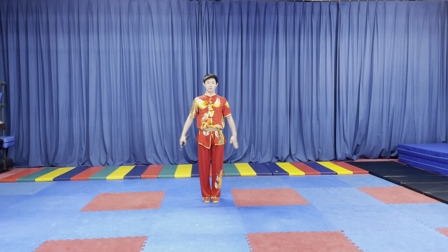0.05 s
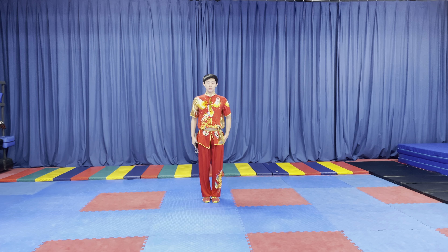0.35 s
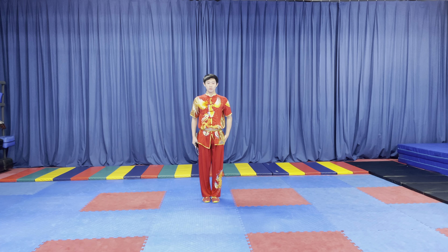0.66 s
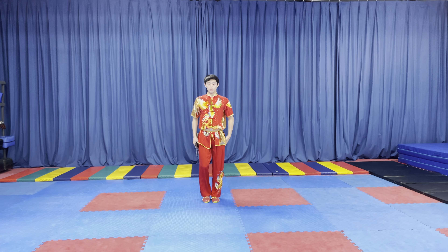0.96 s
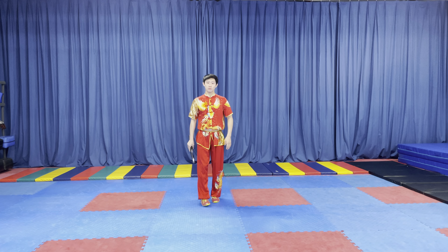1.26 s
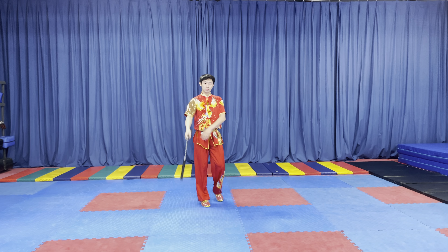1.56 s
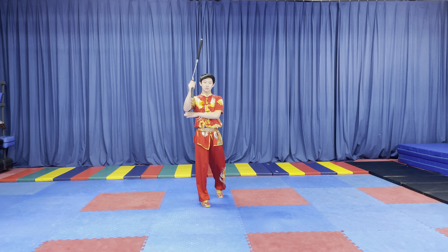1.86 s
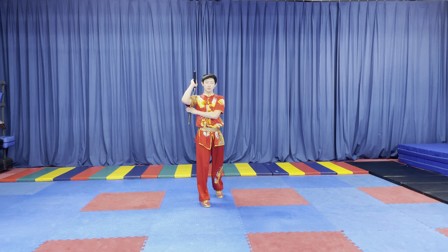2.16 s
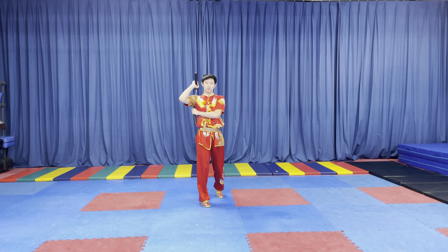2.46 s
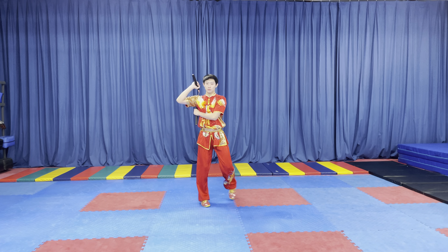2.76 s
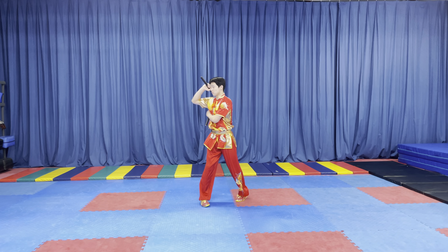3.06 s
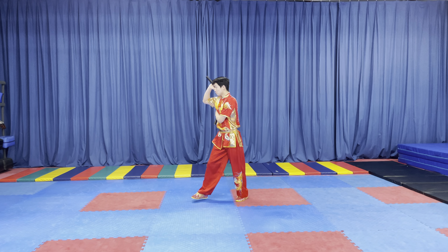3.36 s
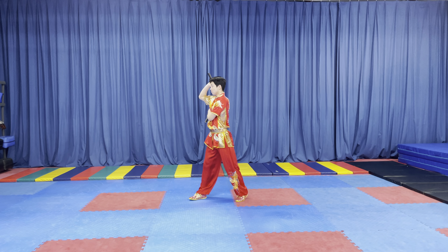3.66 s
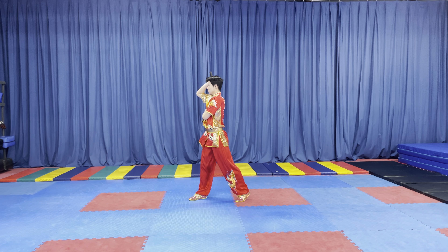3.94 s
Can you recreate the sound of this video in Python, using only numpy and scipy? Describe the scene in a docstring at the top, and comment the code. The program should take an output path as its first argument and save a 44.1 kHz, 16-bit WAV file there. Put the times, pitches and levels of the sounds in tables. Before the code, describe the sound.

A nunchaku's chain clicks and jingles as its sticks clack, with soft steps on a mat.

```python
"""A nunchaku is handled some metres away in a large curtained hall. Its steel chain links click, chatter
and ring very high until a neighbour damps them, and the sticks clack and slide as they are let go and
swung. A satin suit rustles with the arms; soft steps, scuffs and a light slap come from the mat.
Under it all lie the hall's low rumble, a faint hiss and a mains hum."""
import sys
import numpy as np
from scipy import signal
from scipy.fft import rfft, irfft
from scipy.io import wavfile

SR = 44100
rng = np.random.default_rng(int(sys.argv[2]) if len(sys.argv) > 2 else 0)


def materialize(psi):
    """Save the field psi as 16-bit PCM at rate SR to the path in sys.argv[1].

    A 1-D psi becomes a single channel; in a 2-D psi each row is a channel.
    """
    bounded = np.clip(np.atleast_2d(psi).T, -1, 1)
    quanta = np.round(bounded * 32767).astype(np.int16)
    wavfile.write(sys.argv[1], SR, quanta)


N = 176400

# steel link modes (frequency [Hz], level [dB], t60 [s])
LINK_MODES = [(13299, 0, .7), (13348, -8, .15), (14960, -24, .5), (15463, -17, .5), (15600, -12, .5),
              (15694, -6, .4)]
# a link hangs free (time [s], level [dB], tilt [dB/kHz], attack [s], time until damped [s])
LINK_RINGS = [(0.438, -46.5, 0, 0.0015, .011), (0.447, -60, 3.5, .002, 0.048),
              (0.517, -68, 8, 0.0036, 0.025), (.533, -63, 5.5, 0.0014, 0.019),
              (0.58, -56.5, -6, 0.014, 0.091), (1.286, -65, -3, 0.0012, 0.014),
              (1.304, -80, 3, 0.0038, 0.026)]
def link_rings():
    """Links ring after a contact until a neighbour touches and damps them."""
    pivot_hz = 13300
    out = np.zeros(N)
    for start, level, tilt, rise, free in LINK_RINGS:
        modes = [(hz, level + db + tilt * (hz - pivot_hz) / 1000, t60) for hz, db, t60 in LINK_MODES]
        attack = np.minimum(since(start) / rise, 1)
        damping = 1 / (1 + (since(start) / free) ** 4)
        out += ring(start, modes) * attack * damping
    return out


# the chain runs slack (time [s], attack [s], hold [s], release [s], level [dB])
JINGLES = [(0, 0.0011, 0.015, 0.12, -80), (0.305, 0.0033, 0.008, 0.06, -66),
           (0.434, 0.0036, 0.017, 0.059, -63), (0.516, 0.0089, 0.013, 0.081, -69),
           (1.02, 0.028, 0.034, 0.03, -81), (1.295, 0.075, 0.021, 0.029, -64),
           (1.46, .02, 0.06, 0.099, -77.5), (1.847, 0.017, 0.033, 0.033, -84),
           (2.188, .02, 0.067, 0.055, -77.5)]
# glassy top of the chatter (frequency [Hz], level [dB])
JINGLE_EQ = [(7000, -29.5), (10500, -23.5), (12400, 2), (13400, 9), (14600, 6), (15600, -2), (16000, -6)]
def chain_jingle():
    """Many small link contacts run together into a high chatter."""
    chatter = colour(grains(per_second=800, spread=0.66), JINGLE_EQ)
    return chatter * swells(JINGLES)


# link hits link (time [s], level [dB])
CLICKS = [(.003, -57), (0.131, -47), (.138, -46), (.3185, -44), (.438, -40), (.462, -42), (.524, -51),
          (0.533, -47), (0.638, -58), (0.755, -57), (.879, -65), (1.024, -62), (1.039, -65), (1.351, -30),
          (1.357, -33.5), (1.535, -52), (1.644, -52)]
# bright tick of steel (frequency [Hz], level [dB])
CLICK_EQ = [(2000, -12.5), (5000, -22), (8000, -24), (11000, -6.5), (13200, 6), (14600, -19), (15700, 5.5)]
# chain hits stick (time [s], level [dB])
RATTLES = [(2.289, -60.5), (2.297, -73), (2.312, -62)]
# duller bite of the rattle (frequency [Hz], level [dB])
RATTLE_EQ = [(3000, -13.5), (4800, 2), (6400, -1.5), (9000, -20)]
def chain_hits():
    """Links click together and rattle over the end of a stick."""
    return impacts(CLICKS, CLICK_EQ, decay_s=0.001) + impacts(RATTLES, RATTLE_EQ, decay_s=0.0012)


# swivel pings (time [s], frequency [Hz], level [dB], t60 [s])
SWIVEL_PINGS = [(.445, 7940, -76, 0.41), (.452, 8087, -69.5, 0.32), (.644, 6390, -83, 0.087)]
def swivel():
    """The swivel rings with one mode each time the chain jerks it."""
    return sum(ring(start, [mode]) for start, *mode in SWIVEL_PINGS)


# stick hits, and at 1.357 s the bright snap of the chain pulling taut (time [s], ring level [dB], crack level
# [dB], crack tilt [dB/octave])
CLACKS = [(.319, -75, -62, 6), (1.357, -69, -44.5, 5), (1.3592, -45.5, -49.5, -2), (1.3643, -49, -46, -1.5),
          (1.371, -66, -53, 0), (1.3846, -53, -50, -0.5), (1.641, -69, -81, 8), (1.727, -65.5, -76, -3),
          (2.232, -72, -58.5, 7.5), (2.5522, -59, -51, 2), (2.8888, -72, -63, -2)]
# tone of the crack before its tilt (frequency [Hz], level [dB])
CRACK_EQ = [(150, 8), (420, 9), (850, 5), (2600, 2), (3800, -8), (4900, -5.5), (7000, -14.5),
            (10000, -25.5), (15000, -21)]
def stick_cracks():
    """The transient of each clack, and of the chain's taut snap: a burst of contact noise with its own
    brightness."""
    return sum(impacts([(start, db)], tilted(CRACK_EQ, tilt), decay_s=0.0012)
               for start, _, db, tilt in CLACKS)


# stick modes (frequency [Hz], level [dB], t60 [s])
STICK_MODES = [(1285, -9, 0.011), (2217, 1, 0.012), (4900, -22, 0.0074)]
def stick_knocks():
    """The body of each clack: the struck stick gives a short, pitched knock."""
    return sum(amp(db) * ring(start, STICK_MODES) for start, db, _, _ in CLACKS)


# stick slides (time [s], attack [s], hold [s], release [s], level [dB])
SLIDES = [(.298, 0.019, 0.0047, 0.074, -67.5), (.43, 0.012, 0.01, 0.075, -70),
          (1.38, 0.079, 0.056, 0.052, -75)]
# midrange rasp (frequency [Hz], level [dB])
SLIDE_EQ = [(500, -19.5), (1200, -9), (1700, 4), (2300, -2), (2900, -21), (6000, -27)]
def stick_slides():
    """The sticks rub on each other and in the hand."""
    return noise(SLIDE_EQ) * swells(SLIDES)


# arm moves (time [s], attack [s], hold [s], release [s], level [dB], tilt [dB/octave])
RUSTLES = [(0.127, 0.015, 0.011, 0.079, -68, 3.5), (0.443, 0.021, 0.1, 0.15, -80.5, 6),
           (1.014, 0.06, 0.012, 0.016, -80, 0), (1.362, 0.0069, 0.024, 0.049, -66.5, 1.5),
           (1.443, 0.028, 0.038, 0.11, -73.5, -1.5), (1.628, 0.011, 0.015, 0.021, -72, 0),
           (1.836, 0.01, 0.049, 0.079, -74.5, -5), (2.028, 0.078, 0.037, 0.07, -77.5, -0.5),
           (2.194, 0.031, 0.09, 0.022, -75.5, 5), (3.188, 0.023, 0.018, 0.012, -69.5, 2),
           (3.222, 0.033, 0.016, 0.012, -64.5, 6.5), (3.6, 0.018, 0.014, 0.018, -85, 2),
           (3.778, 0.017, 0.0093, 0.018, -83, 0.5)]
# sheen of satin (frequency [Hz], level [dB])
SATIN_EQ = [(500, -11), (1500, 8.5), (3000, 0), (5000, -3), (7000, -1.5), (8300, -7.5), (9600, -7.5),
            (13300, -5), (15500, -15)]
def suit_rustle():
    """Satin folds rub in tiny uneven grains, brighter or duller with each move."""
    rub = grains(per_second=700, spread=0.43)
    return sum(swell(*shape) * colour(rub, tilted(SATIN_EQ, tilt)) for *shape, tilt in RUSTLES)


# footfalls (time [s], attack [s], hold [s], release [s], level [dB])
STEPS = [(1.1, 0.026, 0.028, 0.031, -44), (2.11, 0.006, 0.021, 0.054, -43.5),
         (2.61, 0.022, 0.015, 0.042, -44), (3.0, 0.0075, 0.069, 0.08, -44.5)]
# deep, padded thud (frequency [Hz], level [dB])
STEP_EQ = [(25, -25), (58, 19), (95, 7), (150, -11.5), (400, -27.5), (1200, -75)]
def footsteps():
    """Feet land softly on the mat in swells of bass noise."""
    return noise(STEP_EQ) * swells(STEPS)


# sole drags (time [s], attack [s], hold [s], release [s], level [dB])
SCUFFS = [(.56, 0.072, .29, 0.028, -74.5), (2.94, 0.05, 0.083, 0.086, -66),
          (3.11, 0.0077, 0.025, 0.048, -64), (3.32, 0.047, .03, 0.078, -66.5)]
# muffled low-mid brush (frequency [Hz], level [dB])
SCUFF_EQ = [(120, -7), (280, 8.5), (600, 7.5), (950, -10), (1500, -21), (3000, -47)]
def sole_scuffs():
    """Soles rub across the mat."""
    return noise(SCUFF_EQ) * swells(SCUFFS)


# sole hits (time [s], level [dB])
SLAPS = [(3.9112, -45.5), (3.922, -58)]
# dull smack (frequency [Hz], level [dB])
SLAP_EQ = [(150, 4.5), (600, -3.5), (1050, 2), (1600, -12.5), (2200, -13.5), (3200, -41), (4600, -16.5),
           (6000, -37), (12000, -57)]
def foot_slap():
    """A foot lands with a light slap."""
    return impacts(SLAPS, SLAP_EQ, decay_s=0.0019)


def floor_bounce(x, delay_s, echo_db):
    """A sound plus its single reflection off the floor."""
    return x + amp(echo_db) * np.pad(x, (int(delay_s * SR), 0))[:N]


# reverb decay (frequency [Hz], t60 [s])
HALL_DECAY = [(200, 0.81), (2000, 0.5), (6000, 0.35), (14000, 0.14)]
def hall_tail():
    """Diffuse stereo tail of unit energy; the treble dies first."""
    t = np.arange(SR) / SR
    hz, t60s = np.array(HALL_DECAY).T
    spectrum = rfft(rng.standard_normal((2, SR)))
    log_f = np.log(np.arange(SR // 2 + 1) + 1)
    tail = np.zeros((2, SR))
    for share, t60 in zip(np.eye(len(hz)), t60s):
        band = irfft(spectrum * np.interp(log_f, np.log(hz), share))
        tail += band * np.exp(-np.log(1000) * t / t60)
    build_up = 1 - np.exp(-t / 0.0014)
    return unit(tail * build_up) / np.sqrt(SR)


def in_hall(x, tail, wet_db, lag_s=0):
    """Direct sound reaches the right microphone port lag_s after the left; the hall adds its tail."""
    hz = np.arange(N // 2 + 1) * SR / N
    right = irfft(rfft(x) * np.exp(-2j * np.pi * hz * lag_s))
    reverb = signal.fftconvolve(x[None], tail, axes=1)[:, :N]
    return np.array([x, right]) + amp(wet_db) * reverb


# low, middle and high layers of the room tone (frequency [Hz], level [dB])
RUMBLE_EQ = [(20, -39.5), (32, -13), (42, -7), (62, 3.5), (73, -5.5), (90, 0), (125, -8), (180, -11.5),
             (260, -21), (400, -31.5), (900, -80.5)]
MURK_EQ = [(40, -14), (130, 4.5), (250, 7), (450, 1.5), (800, -0.5), (1300, -8), (2000, -13), (2900, -33.5),
           (6000, -51)]
HISS_EQ = [(1000, -1), (4500, 0), (7000, -2), (9500, -10), (13000, -8), (15000, -21.5)]
# room tone fader moves (time [s], rumble trim [dB], murk level [dB])
ROOM_FADERS = [(0, -2.5, -65), (.5, -0.5, -66), (.85, -1, -65.5), (1.1, -2, -66.5), (1.7, 1, -65.5),
               (2.3, -1.5, -63.5), (2.8, 0.5, -62.5), (4, 1.3, -59)]
def room_tone():
    """The hall's air: a narrow rumble, a wide murky middle and a faint hiss."""
    times, trim_db, murk_db = np.array(ROOM_FADERS).T
    rumble = amp(-49) * fader(times, trim_db) * stereo_noise(RUMBLE_EQ, side=0.17) * pan(left_db=-0.4)
    murk = fader(times, murk_db) * stereo_noise(MURK_EQ, side=1.134) * pan(left_db=1)
    hiss = amp(-84.5) * stereo_noise(HISS_EQ, side=1)
    return rumble + murk + hiss


# hum fader moves (time [s], level [dB])
HUM_FADER = [(0, -54), (.3, -50), (.6, -55.5), (.9, -53), (1.6, -58.5), (2.3, -58.5), (4, -56)]
def mains_hum(hz=119.1):
    """One low mains tone whose phase wavers slowly."""
    waver = unit(noise([(1, -10.5), (4, 0), (12, -28), (40, -107.5)]))
    tone = np.sqrt(2) * np.sin(2 * np.pi * hz * since(0) + 0.47 * waver)
    return fader(*np.array(HUM_FADER).T) * tone


def amp(db):
    """Decibels to gain."""
    return 10 ** (np.asarray(db) / 20)


def since(start):
    """Seconds elapsed after a moment, zero before it."""
    return np.maximum(np.arange(N) / SR - start, 0)


def unit(x):
    """Scale to rms 1."""
    return x / np.sqrt(np.mean(x ** 2))


def pan(left_db):
    """Stereo gains with the left side left_db above the right."""
    return amp(np.array([[left_db], [-left_db]]) / 2)


def fader(times, db):
    """Gain that glides between levels."""
    return amp(np.interp(since(0), times, db))


def colour(x, eq):
    """Causal filter that keeps the power of white noise, so EQ levels are relative."""
    hz, db = np.array(eq, float).T
    log_f = np.log(np.arange(N + 1) * SR / (2 * N) + 1)
    gain = unit(amp(np.interp(log_f, np.log(hz), db)))
    # minimum phase: nothing sounds ahead of a hit
    cepstrum = irfft(np.log(gain))
    cepstrum[1:N] *= 2
    cepstrum[N + 1:] = 0
    return irfft(rfft(x, 2 * N) * np.exp(rfft(cepstrum)))[..., :N]


def tilted(eq, tilt):
    """An EQ curve brightened by tilt dB per octave."""
    return [(hz, db + tilt * np.log2(hz)) for hz, db in eq]


def noise(eq):
    """Coloured noise of rms near 1."""
    return colour(rng.standard_normal(N), eq)


def stereo_noise(eq, side):
    """Steady mid/side noise; more side makes it wider."""
    return (noise(eq) + side * noise(eq) * np.array([[1], [-1]])) / np.hypot(1, side)


def grains(per_second, spread):
    """Noise made of tiny grains of uneven strength, rms 1."""
    grain = np.arange(N) * per_second // SR
    return unit(rng.standard_normal(N) * np.exp(spread * rng.standard_normal(N)[grain]))


def swell(start, attack, hold, release, db):
    """Attack, hold and exponential release."""
    return amp(db) * np.minimum(since(start) / attack, 1) * np.exp(-since(start + attack + hold) / release)


def swells(cues):
    """One envelope from several swells."""
    return sum(swell(*cue) for cue in cues)


def impacts(hits, eq, decay_s):
    """Very short bursts of coloured noise."""
    force = sum(amp(db) * (since(start) > 0) * np.exp(-since(start) / decay_s) for start, db in hits)
    return colour(force * rng.standard_normal(N), eq)


def ring(start, modes):
    """Decaying modes struck at one moment."""
    out, first = np.zeros(N), int(start * SR)
    t = np.arange(min(SR // 2, N - first)) / SR
    for hz, db, t60 in modes:
        decay = np.exp(-np.log(1000) * t / t60)
        out[first:first + len(t)] += amp(db) * np.sqrt(2) * np.sin(2 * np.pi * hz * t) * decay
    return out


def scene():
    """Nunchaku, suit and feet over the room tone; hits, knocks and rubbing sit a little to the left."""
    tail = hall_tail()
    rubbing = suit_rustle() + stick_slides() + sole_scuffs()
    hits = stick_cracks() + chain_hits() + swivel() + foot_slap()
    hits = floor_bounce(hits, delay_s=0.01, echo_db=-16.5)
    sends = [(hits, 0), (stick_knocks(), -7), (rubbing, -4)]  # (layer, reverb send [dB])
    moves = sum(in_hall(layer, tail, wet_db, lag_s=0.00003) for layer, wet_db in sends)
    chain = in_hall(link_rings() + chain_jingle(), tail, wet_db=-12.5)
    return chain + pan(left_db=2.5) * moves + footsteps() + mains_hum() + room_tone()


# microphone notches (frequency [Hz], width [Hz], level [dB])
MIC_DIPS = [(5645, 240, -8.5), (7470, 180, -11), (8900, 140, -6.5)]
def record(dry):
    """The microphone has a few treble dips and a steep top edge."""
    f = np.arange(N + 1) * SR / (2 * N)
    gain = amp(sum(db * np.exp(-((f - hz) / width) ** 2) for hz, width, db in MIC_DIPS))
    notched = irfft(rfft(dry, 2 * N) * gain)[:, :N]
    high_cut = signal.ellip(12, .2, 80, 15850, fs=SR, output="sos")
    return signal.sosfilt(high_cut, notched)


dry = scene()
out = record(dry)
materialize(out)
```